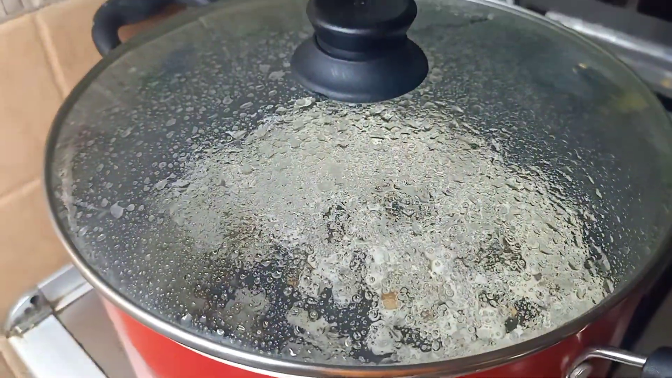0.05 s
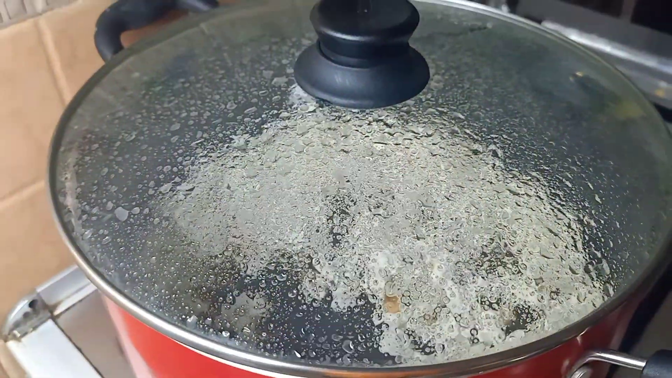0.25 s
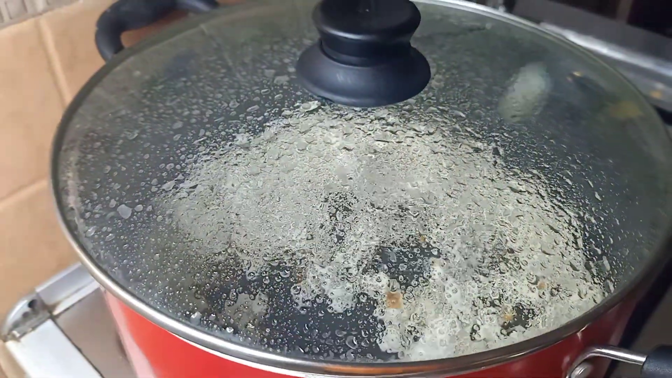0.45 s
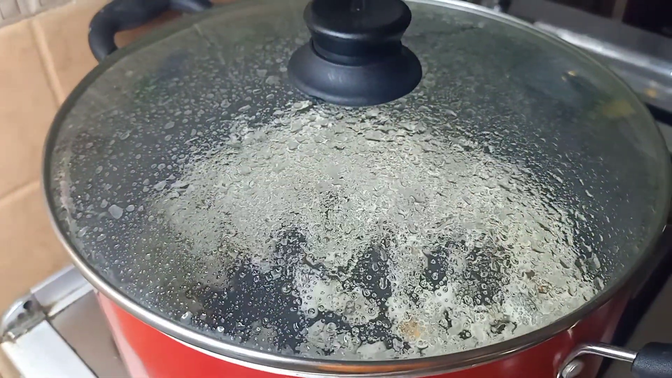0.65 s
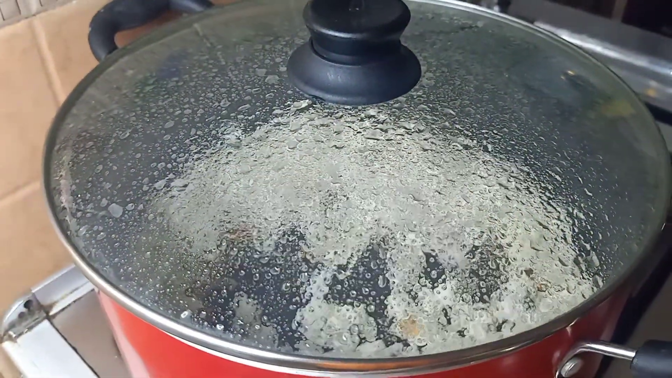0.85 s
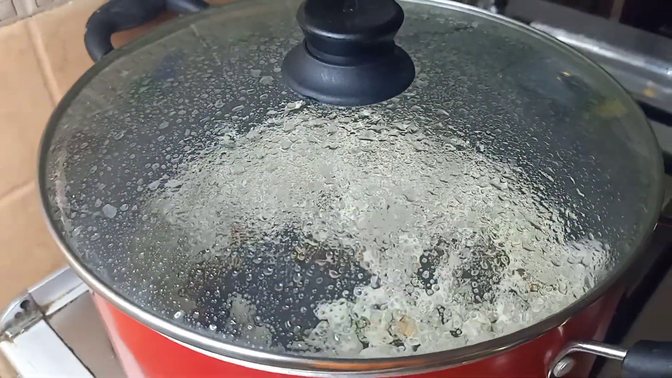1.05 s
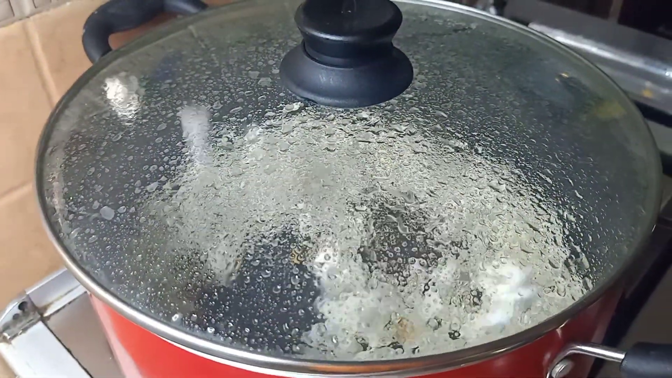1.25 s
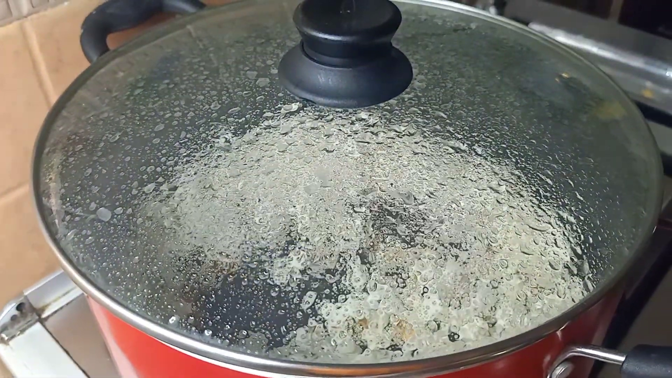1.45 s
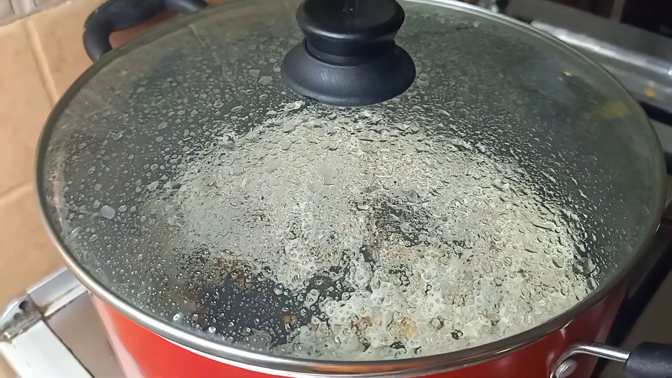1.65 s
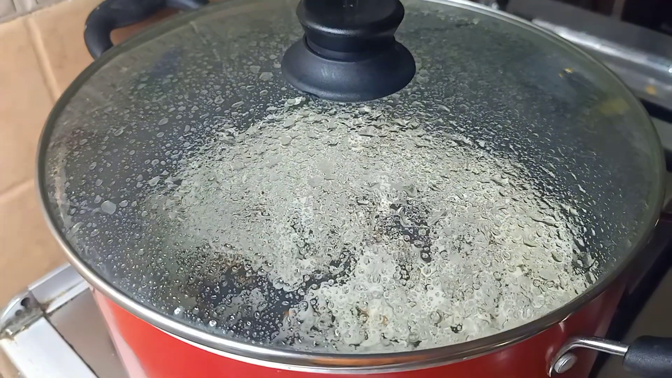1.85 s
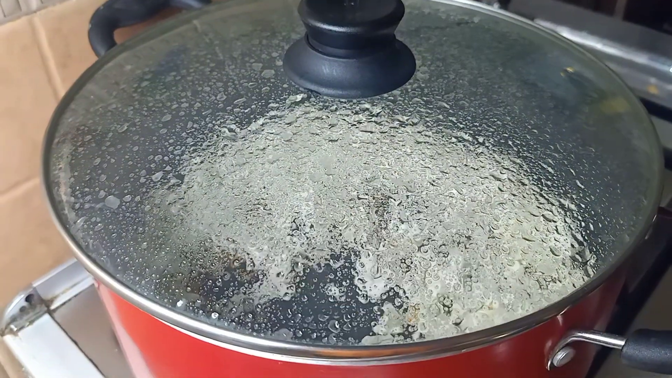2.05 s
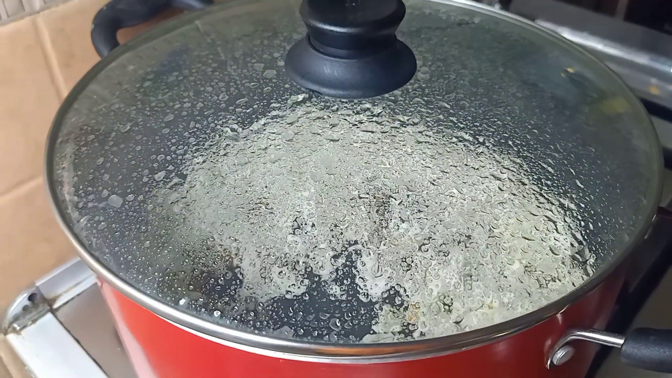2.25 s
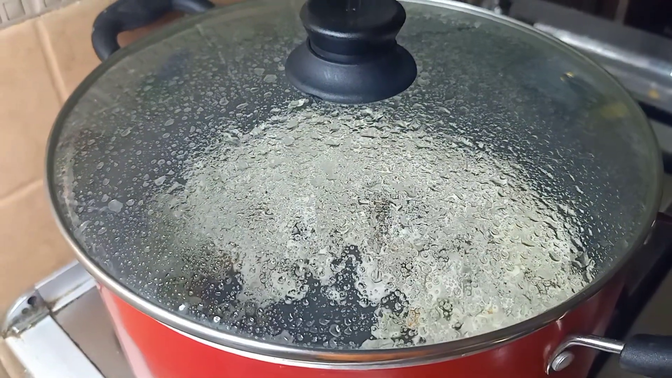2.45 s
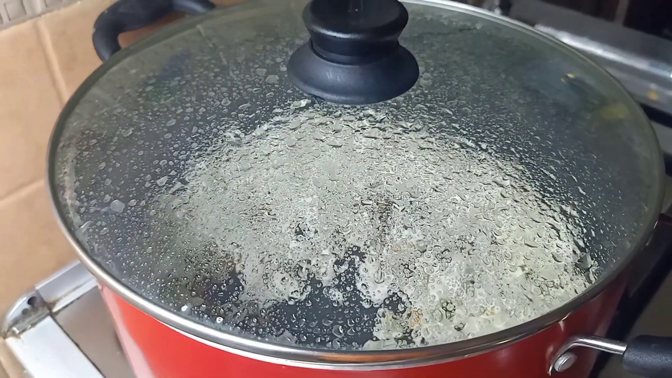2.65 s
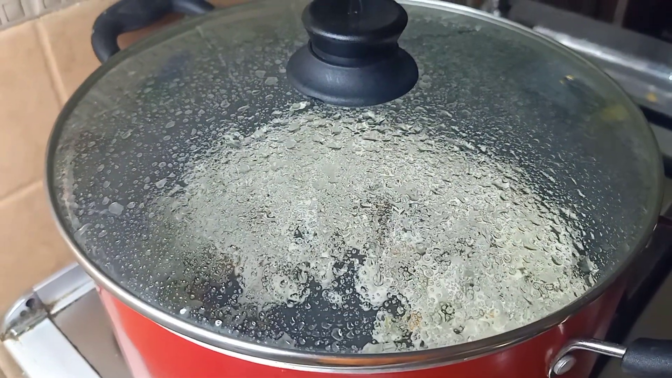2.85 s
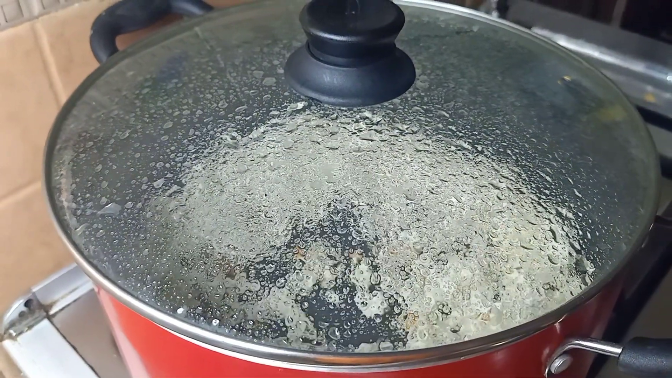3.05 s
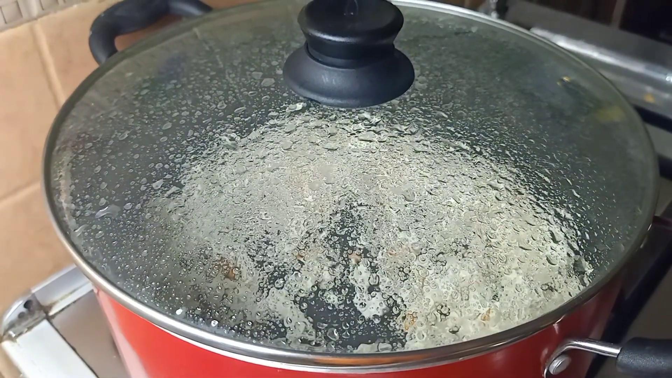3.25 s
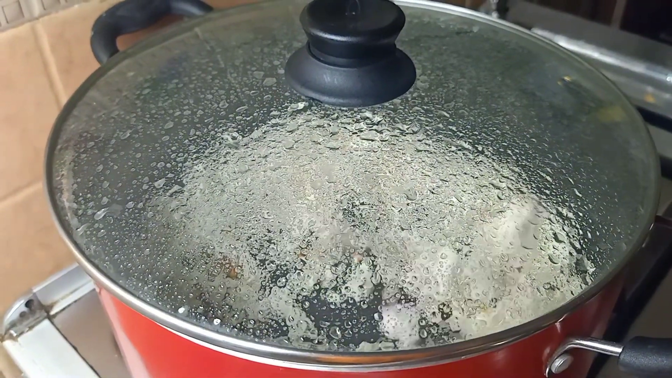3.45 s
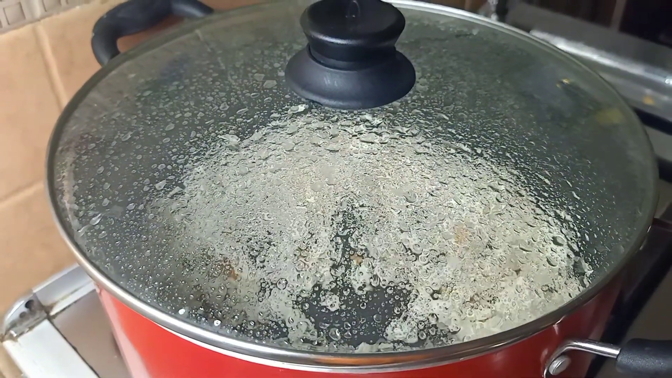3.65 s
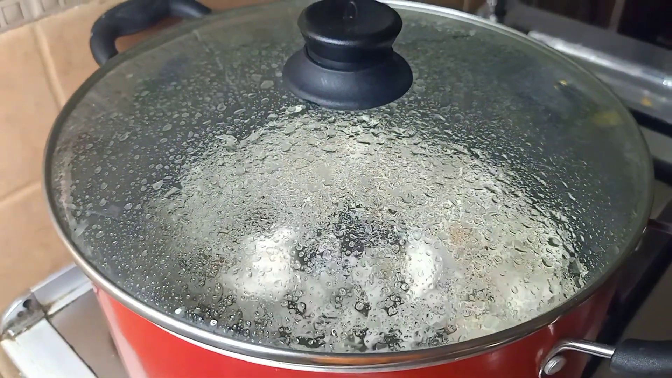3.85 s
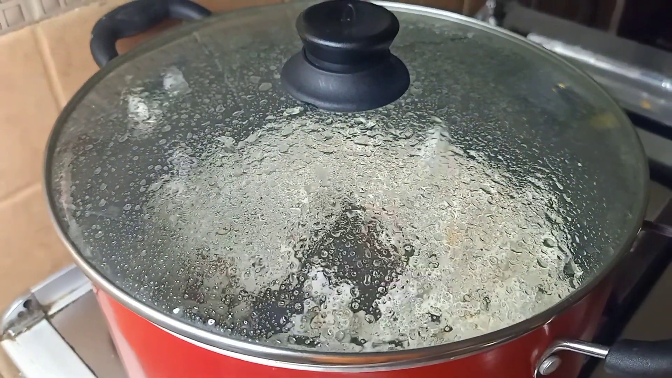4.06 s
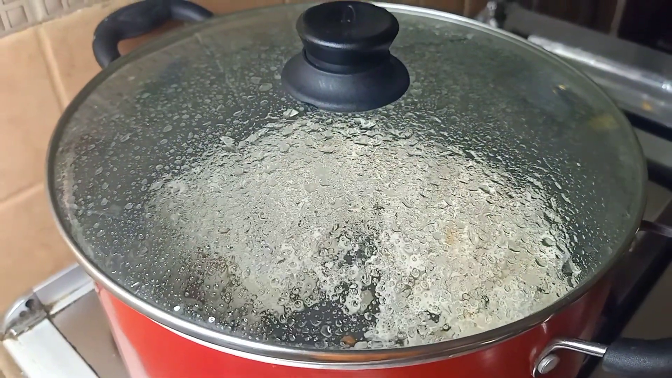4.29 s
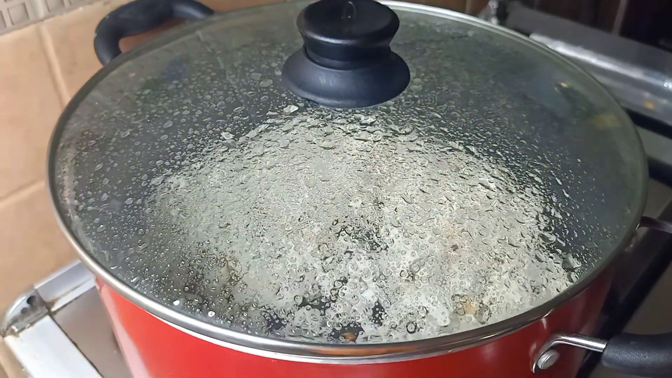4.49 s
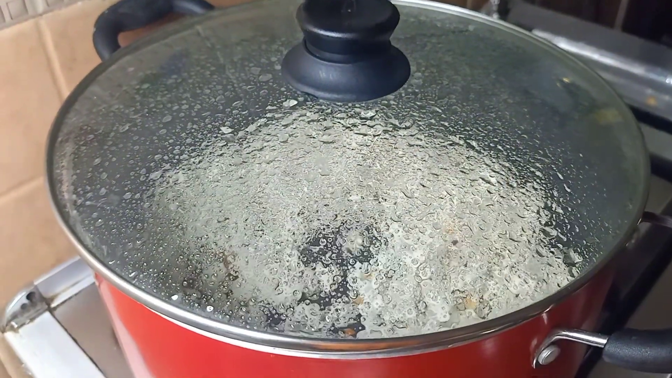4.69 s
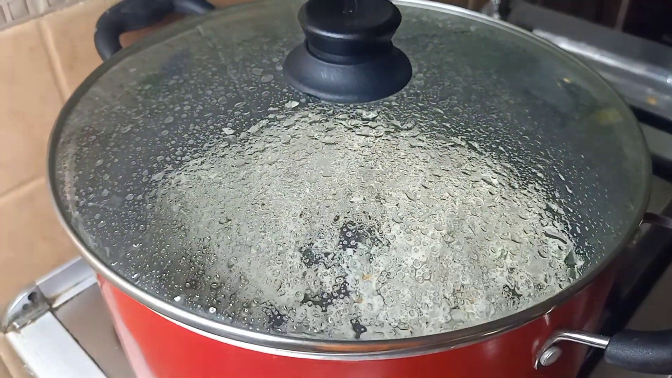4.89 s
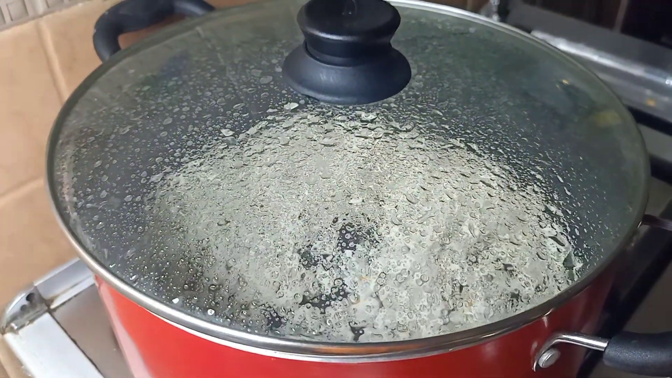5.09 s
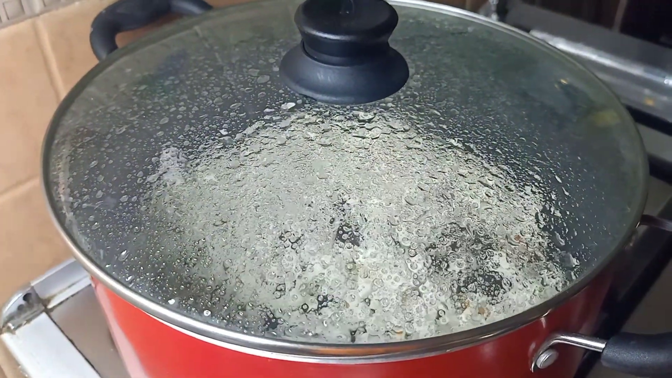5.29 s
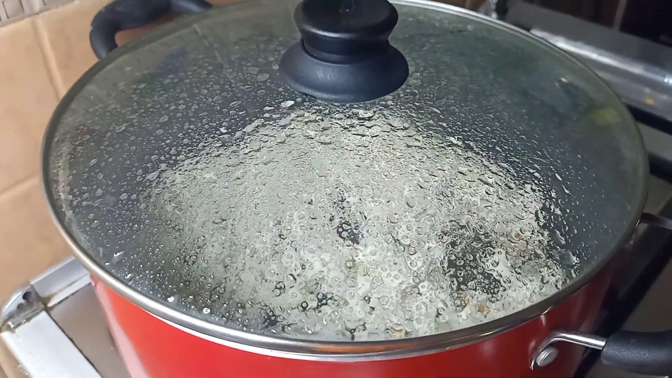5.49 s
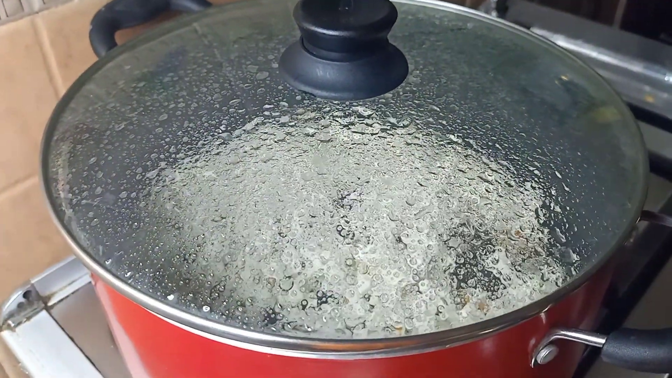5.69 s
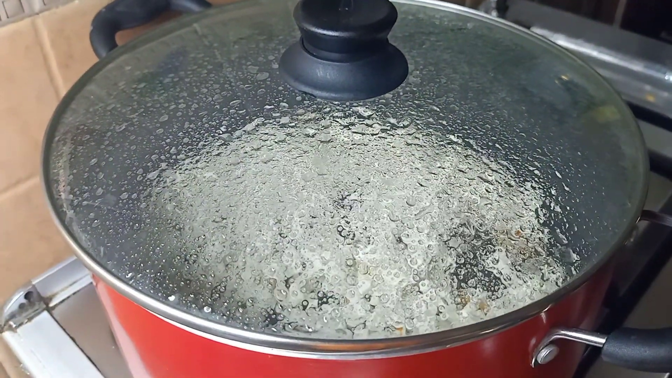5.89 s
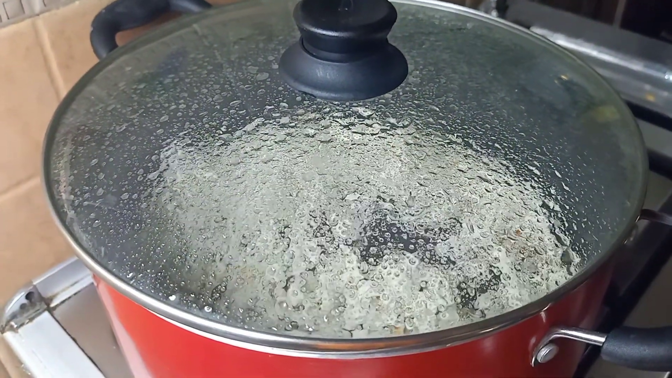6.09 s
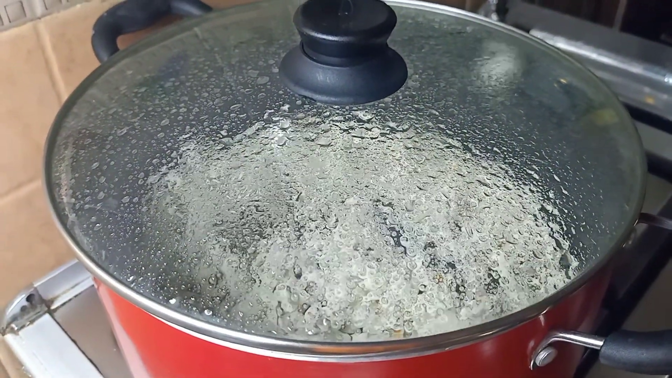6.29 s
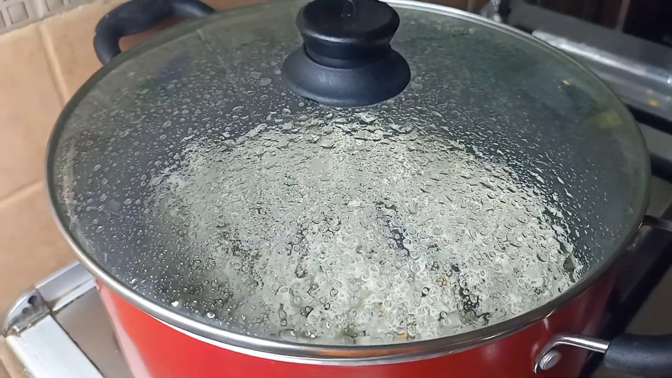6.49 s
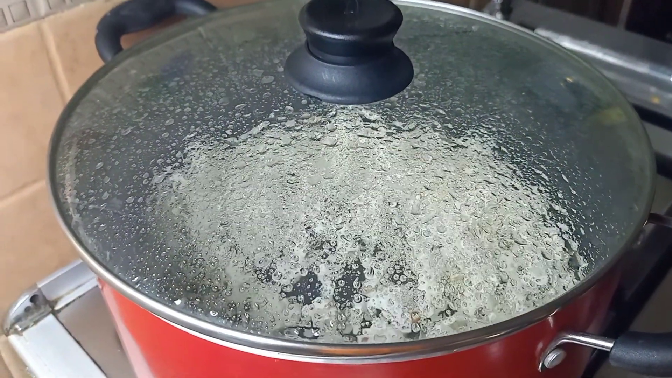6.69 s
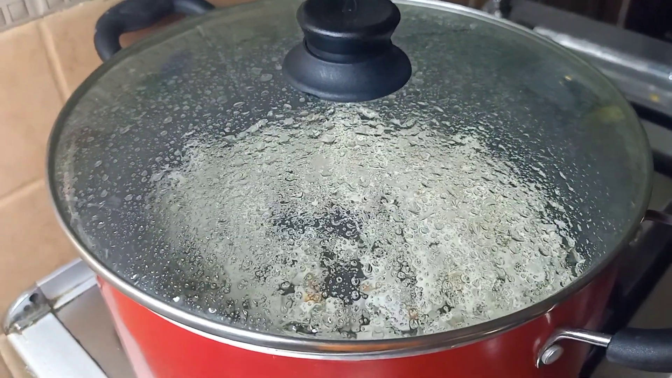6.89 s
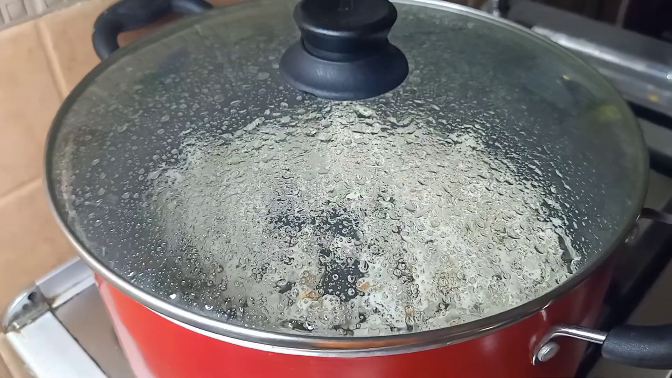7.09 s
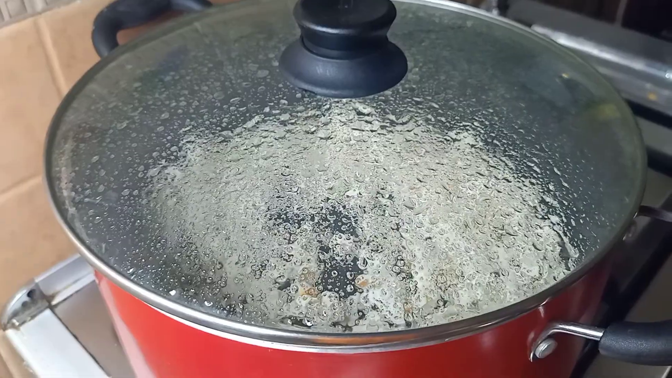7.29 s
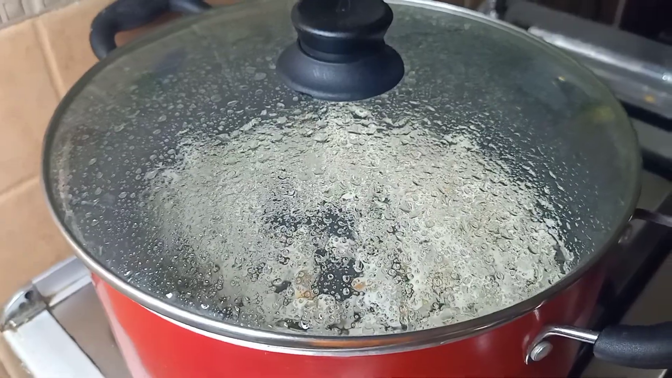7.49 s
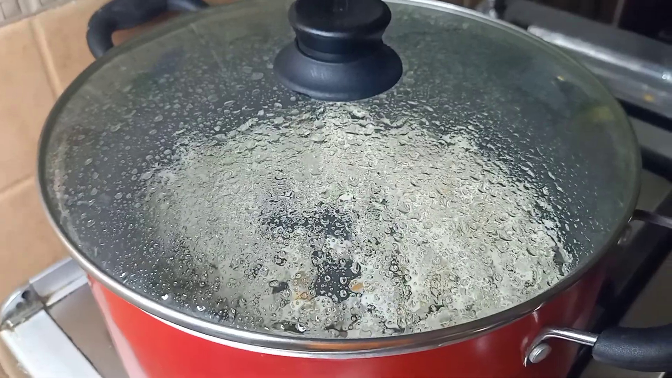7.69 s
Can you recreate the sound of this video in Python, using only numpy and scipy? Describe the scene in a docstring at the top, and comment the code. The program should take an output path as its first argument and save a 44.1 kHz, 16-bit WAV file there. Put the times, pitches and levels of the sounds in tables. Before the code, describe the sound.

Kernels burst irregularly in a covered pot on a stove: dry crack, hollow thump, short metallic ring of wall and lid. Pops crowd together early, pause around two to three seconds, grow dense again past four, then come in scattered pairs. Tiny clinks, soft bumps and barely audible oil spits fill in. Close microphone, small kitchen with short echo, slightly stronger ringing on the right.

```python
"""Small kitchen: popcorn pops close by in a metal pot under a glass lid.
Each kernel bursts with a crack of steam, thumps the air in the pot and scatters flakes; pot and lid ring.
Pops are shaped noise plus decaying modes, shorter when strong; soon after onset the level drops, most if early.
Flung kernels clink on the walls as ringing modes, flakes bump on the base, hot oil spits as bright noise.
Underneath lie a faint noise sizzle and a low sine hum that wavers in pitch and level."""
import sys
import numpy as np
from scipy import signal
from scipy.fft import rfft, irfft
from scipy.io import wavfile

SR = 44100
rng = np.random.default_rng(int(sys.argv[2]) if len(sys.argv) > 2 else 0)


def bounce(signal):
    """Save signal as a 16-bit WAV file at the path given by the first command-line argument."""
    frames = np.transpose(np.atleast_2d(signal))
    limited = np.clip(frames, -1, 1)
    pcm = np.round(limited * 32767).astype(np.int16)
    wavfile.write(sys.argv[1], SR, pcm)


N = 341334
EVENT_SIZE = 12288  # samples
AGE_S = np.arange(EVENT_SIZE) / SR

# kitchen echo bands: (frequency [Hz], t60 [s], level [dB])
ROOM_BANDS = [(100, 0.068, -13.5), (226, 0.25, -5.5), (400, 0.42, -4.5), (840, 0.3, -6), (2500, 0.18, -9.5),
              (7140, 0.21, -12.5), (14750, .22, -13.5)]
# sizzle colour: (frequency [Hz], level [dB])
SIZZLE_COLOUR = [(25, -9), (60, -9), (110, 7.5), (185, -2.5), (300, -6.5), (345, -12), (395, -3),
                 (450, -11), (610, -9.5), (950, -10.5), (1500, -12.5), (2400, -6.5), (3300, -16.5),
                 (5000, -23.5), (7300, -21), (15000, -36)]
# slow swell of the low hum: (time [s], level [dB])
HUM_SWELL = [(0, -79), (2.4, -78.5), (2.58, -65.5), (2.85, -72), (2.98, -73.5), (5.5, -79), (5.65, -67),
             (5.85, -61), (5.96, -80), (7.35, -76), (7.55, -66.5), (7.68, -85)]
# spits of hot oil: (time [s], level [dB])
OIL_SPITS = [(1.017, -65.5), (1.667, -74), (3.707, -72.5), (4.011, -69), (4.373, -70.5), (4.92, -67.5),
             (4.963, -70.5), (6.8, -74), (6.997, -70.5)]
# flakes dropping back onto the base: (time [s], level [dB], pitch [Hz], t60 [s])
FLAKE_BUMPS = [(1.327, -41, 619, 0.078), (1.661, -60, 129, 0.11), (3.074, -54.5, 400, 0.11),
               (3.213, -62, 284, 0.15), (3.657, -55.5, 377, 0.047), (4.53, -57, 201, 0.074),
               (6.478, -61, 404, 0.067), (6.709, -51, 510, 0.049), (7.158, -59.5, 141, 0.17),
               (7.335, -62.5, 113, 0.24)]
# hard kernels striking the pot: (time [s], level [dB], pitch [Hz], t60 [s])
KERNEL_CLINKS = [(0.294, -52, 1510, .04), (.534, -33.5, 2500, 0.081), (0.694, -28, 3470, 0.036),
                 (.885, -39, 2265, 0.19), (1.133, -44, 1035, 0.12), (1.338, -29.5, 2140, 0.027),
                 (1.342, -25.5, 2685, 0.029), (2.077, -34, 2700, 0.081), (3.786, -36.5, 2240, 0.024),
                 (3.95, -36.5, 2140, 0.012), (4.013, -41, 1390, 0.011), (4.071, -34, 2630, 0.06),
                 (4.209, -23, 2500, 0.053), (4.222, -32, 3030, 0.034), (4.487, -51, 2500, 0.054),
                 (4.805, -38.5, 2570, 0.035), (4.811, -40.5, 2900, 0.031), (5.286, -39, 2730, 0.13),
                 (6.028, -31.5, 1340, 0.016), (6.057, -41, 2400, 0.012), (6.058, -43, 4000, 0.018),
                 (6.104, -43, 3150, 0.017), (6.729, -49.5, 2500, 0.12), (6.899, -52, 2640, 0.054),
                 (6.918, -49, 3310, 0.086)]
# bursting kernels: (time [s], level [dB], thump over level [dB], knock over level [dB], crack over level [dB],
# time from onset to the drop in level [s], wall pitch [Hz], left minus right of the wall sound [dB])
KERNEL_POPS = [(0.22, -43, -10, -14, -15, .092, 2030, -8), (0.266, -46, 3, -4.5, -11, 0.057, 1678, -3),
               (0.53, -48, 6, 1, -11.5, 0.046, 2600, -3), (0.561, -31, -5.5, -8.5, -8.5, 0.011, 2394, -2.5),
               (0.621, -36.5, -9, -14.5, -23, 0.073, 1940, -4),
               (0.642, -25, -4, -8.5, -11, 0.061, 2400, -3), (0.719, -30, -6, -17, -3.5, 0.026, 2855, -3.5),
               (0.883, -39.5, -8, -7, -16, 0.13, 2020, 0),
               (1.104, -36.5, -0.5, -14.5, -13, 0.095, 2470, -3.5),
               (1.281, -38, 7.5, -13.5, -11.5, 0.09, 2490, -4.5),
               (1.336, -38.5, -4.5, -6, -9.5, 0.026, 2470, -5),
               (1.504, -40.5, -9.5, -20.5, -6.5, 0.031, 2520, -4.5),
               (1.856, -50, 4.5, -1, -18, 0.13, 2000, -3), (2.075, -38, 0, -9, 0, 0.054, 2856, 0),
               (2.961, -42.5, -2, -2.5, -7.5, 0.039, 1936, -4),
               (2.981, -48.5, -20, 1.5, -13, 0.03, 2860, -15),
               (2.997, -30.5, -9, -19, -10.5, 0.0072, 2737, -2),
               (3.182, -48, 1, -4, -18.5, 0.041, 2390, -1.5), (3.58, -47, 0, -3, -8, 0.052, 2643, -2.5),
               (3.755, -39, 0, -4.5, -12, 0.048, 1690, -1.5), (3.783, -49.5, 2, 0.5, -21, 0.024, 2010, -7),
               (3.931, -32.5, -11, -13.5, -13.5, 0.0036, 1166, -2.5),
               (3.949, -43, -8, -11, -21.5, 0.14, 2110, -4), (4.067, -44.5, -4, -5, -8.5, 0.14, 2654, -1),
               (4.155, -54, 2, 1.5, -28, 0.11, 2640, -3), (4.199, -32.5, -11, -10, -11.5, 0.04, 1324, -3),
               (4.214, -26.5, -12.5, -18.5, -11, 0.025, 3047, -2.5),
               (4.446, -33.5, -2.5, -13.5, -7.5, 0.014, 2780, -7),
               (4.504, -53.5, 4, 0.5, -9, 0.054, 2480, -3), (4.65, -25.5, -7.5, -20, -7.5, 0.029, 2037, -5),
               (4.771, -39.5, -4.5, -11, -13, 0.23, 2240, -3),
               (5.211, -34.5, -7.5, -11, -20, 0.0047, 1240, -5.5),
               (5.251, -35, 0.5, -1.5, -9, 0.0058, 1790, -7), (5.302, -35.5, -1, -9, -9, 0.082, 2360, -5.5),
               (5.612, -41.5, -7, -11, -16.5, 0.059, 2080, -4),
               (6.027, -34.5, 1.5, -13, -16.5, 0.086, 1610, -3),
               (6.054, -40, -9, -2, -11.5, 0.13, 1764, -7.5),
               (6.241, -29.5, -10.5, -11.5, -11, 0.029, 2477, -2.5),
               (6.334, -32, -7, -11.5, -6.5, 0.027, 2430, -1.5),
               (6.649, -34.5, 0.5, -5, -8, 0.026, 2680, -11), (6.655, -29.5, -4, -3, -8.5, 0.015, 1960, -1),
               (6.853, -39.5, 4, -2, -16.5, 0.032, 1983, -8), (6.896, -49, -10, -24, -12, 0.041, 2490, -2)]
# modes of the air and base of the pot: (frequency [Hz], level [dB], t60 [s])
CAVITY_MODES = [(113.8, -15, 0.2), (179, -5, 0.081), (194.5, 3, 0.055), (228, -11.5, 0.1),
                (383.4, -23.5, 0.23), (533, -43, 0.11), (596.4, -31, 0.26)]
# modes of wall and lid: (frequency [Hz], level [dB], t60 [s])
LID_MODES = [(1033, 0, .14), (1230, -4, .07), (1420, -5, .06), (1675, 0, .16), (1997, -1, .13),
             (2234, -4, .1), (2445, -1, .12), (2612, -2, .1), (2745, -3, .12), (2875, -6, .1),
             (3070, -7, .1), (3205, -8, .1), (3975, -13, .08)]
# colour of the rattling flakes: (frequency [Hz], level [dB])
RATTLE_COLOUR = [(300, -40.5), (700, -13), (1050, -0.5), (1400, -4), (2000, 3), (2700, 2), (3400, -4.5),
                 (4500, -8.5), (6500, -20), (12000, -65)]
# colour of the steam crack: (frequency [Hz], level [dB])
CRACK_COLOUR = [(1500, -41.5), (3500, 2.5), (5200, -5.5), (7300, 4), (9000, -4.5), (11500, -11.5),
                (13500, -14.5), (16000, -29)]
# colour of the hollow knock: (frequency [Hz], level [dB])
KNOCK_COLOUR = [(60, -29.5), (130, -5), (260, 1.5), (385, 4.5), (455, -8), (530, -1), (620, -4.5),
                (720, -11.5), (900, -4), (1400, -15), (4000, -66)]

SIZZLE_DB, HUM_FLICKER_DB = -68.5, 4.5
# a strong pop is spent sooner: flake t60 at the usual level, rise in level that halves it
USUAL_POP_DB, FLAKES_T60_S, HALVING_DB = -35, 0.19, 15.5
# drop in level after a pop: deepest drop, delay that shrinks it by 1 / e, time to fall
DROP_DB, DROP_EASE_S, FALL_S = -14, 0.06, 0.003
# lift of the rattle at the wall and lid modes (for a 0 dB mode), and its width
LID_LIFT_DB, LID_WIDTH_HZ = 7.5, 50
TOP_HZ = 15700


def undb(db):
    """Decibels to gain."""
    return 10 ** (np.asarray(db) / 20)


def fade(t60_s):
    """Exponential decay over one event, t60 at least 3 ms."""
    return np.exp(-np.log(1000) * AGE_S / max(t60_s, .003))


def rise(time_s):
    """Linear onset from 0 to 1."""
    return np.clip(AGE_S / time_s, 0, 1)


def unit(sound):
    """Scale an event to rms 1 over its first 14 ms."""
    return sound / np.sqrt(np.mean(sound[..., :617] ** 2))


def along(points, size, column=1):
    """Table column interpolated over log frequency at every bin of a spectrum."""
    table = np.array(points)
    bins_hz = np.maximum(np.arange(size // 2 + 1) * SR / size, 1)
    return np.interp(np.log(bins_hz), np.log(table[:, 0]), table[:, column])


def response(points, lift_db=0):
    """Causal minimum-phase filter of the given colour, by folding the cepstrum."""
    cepstrum = irfft(np.log(undb(along(points, EVENT_SIZE) + lift_db)))
    cepstrum[1:EVENT_SIZE // 2] *= 2
    cepstrum[EVENT_SIZE // 2 + 1:] = 0
    return np.exp(rfft(cepstrum))


def tint(sound, colour):
    """Give an event a colour and level 1."""
    return unit(irfft(rfft(sound) * colour))


def air(size):
    """Stereo white noise: alike at both ears in the bass, unrelated in the treble."""
    mid, side = rfft(rng.standard_normal((2, size)))
    width = np.minimum(np.arange(len(mid)) * SR / size / 1250, 1) ** 1.4
    left_right = mid + np.array([[1], [-1]]) * width * side
    return irfft(left_right / np.sqrt(1 + width ** 2), size)


def walk(size, rate_hz):
    """Random wandering: straight lines between normal draws."""
    steps = rng.standard_normal(4096)
    return np.interp(np.arange(size) / SR * rate_hz, np.arange(len(steps)), steps)


def pan(db):
    """Gains of left and right, db apart."""
    return undb(np.array([[db], [-db]]) / 2)


def ring(modes, scatter_db, detune, phase_spread):
    """Decaying modes; strengths and phases depend on where the blow lands."""
    out = 0
    for hz, db, t60_s in modes:
        size, shift, left, right = rng.standard_normal(4)
        turn = 2 * np.pi * hz * (1 + detune * shift) * AGE_S
        phase = phase_spread * np.array([[left], [right]])
        out = out + undb(db + scatter_db * size) * fade(t60_s) * np.sin(turn + phase)
    return unit(out)


def kitchen():
    """Room response: direct sound, then noise bands dying at their own rates."""
    noise, out = rfft(air(EVENT_SIZE)), 0
    onset = np.clip((AGE_S - .005) / 0.012, 0, 1)
    for k, (hz, t60_s, db) in enumerate(ROOM_BANDS):
        share = along([(row[0], float(j == k)) for j, row in enumerate(ROOM_BANDS)], EVENT_SIZE)
        decay = fade(t60_s) * onset
        out = out + undb(db) * irfft(noise * share) * decay / np.sqrt(np.sum(decay ** 2))
    out[:, 0] += 1
    return out


def heard(sound, room):
    """An event together with its echo in the room."""
    return signal.fftconvolve(sound, room, axes=1)[:, :EVENT_SIZE]


def add(out, start_s, sound):
    """Mix an event in at its time."""
    first = int(start_s * SR)
    out[:, first:first + EVENT_SIZE] += sound[:, :N - first]


def stove(hum_hz=110, waver_hz=6):
    """Faint even sizzle of coloured noise, and a low hum wavering in pitch and level."""
    grainy = air(N) * undb(1.0 * walk(N, 420))
    sizzle = irfft(rfft(grainy) * undb(along(SIZZLE_COLOUR, N)), N)
    pitch_hz = hum_hz + waver_hz * walk(N, 35)
    hum = np.sqrt(2) * np.sin(2 * np.pi * np.cumsum(pitch_hz) / SR)
    swell_db = np.interp(np.arange(N) / SR, *np.transpose(HUM_SWELL))
    hum_db = swell_db + HUM_FLICKER_DB * walk(N, 18)
    return undb(SIZZLE_DB) * sizzle / sizzle.std() + undb(hum_db) * hum


def spit(colours):
    """Hot oil spits: a short decay of bright noise."""
    return tint(air(EVENT_SIZE) * fade(0.1), colours["crack"])


def bump(hz, t60_s, colours):
    """A soft flake lands: slow push on a close pair of low modes, with a little knock."""
    pair = [(hz, 0, t60_s), (hz * .87, -6, t60_s)]
    tone = ring(pair, scatter_db=0, detune=.01, phase_spread=.2)
    knock = tint(air(EVENT_SIZE) * fade(t60_s), colours["knock"])
    return unit(rise(0.0026) * (tone + undb(-13.5) * knock))


def lid():
    """Wall and lid ring together, a little differently at every blow."""
    return ring(LID_MODES, scatter_db=2.5, detune=.004, phase_spread=1.5)


def lid_peaks():
    """Lift in dB that the modes of wall and lid give to a sound inside the pot."""
    bins_hz = np.arange(EVENT_SIZE // 2 + 1) * SR / EVENT_SIZE
    peaks = sum(undb(db) * np.exp(-((bins_hz - hz) / LID_WIDTH_HZ) ** 2) for hz, db, _ in LID_MODES)
    return LID_LIFT_DB * peaks


def hull(hz, t60_s=0.05, neighbours_db=-4):
    """Short wall modes around the pitch of the spot where the kernel lies."""
    modes = [(hz * .84, neighbours_db, t60_s / 2), (hz, 0, t60_s), (hz * 1.02, neighbours_db, t60_s / 2)]
    return ring(modes, scatter_db=1.5, detune=.004, phase_spread=1.2)


def clink(hz, t60_s, colours):
    """A hard kernel rings the wall where it strikes, with a tick and a little of the lid."""
    wall = undb(-6) * hull(hz, t60_s, neighbours_db=1.0)
    tick = undb(-16.5) * tint(air(EVENT_SIZE) * fade(t60_s), colours["rattle"])
    return pan(-8.5) * rise(0.0012) * (wall + tick + undb(-34.5) * lid())


def burst(t60_s, flakes_db, snap_t60_s=0.04):
    """The hull splits in a rush of steam; shaken flakes follow in grainy clumps."""
    clumps = undb(2.5 * walk(EVENT_SIZE, 110) * rise(.015))
    grain = undb(3.5 * walk(EVENT_SIZE, 700))
    flakes = undb(flakes_db) * clumps * fade(t60_s)
    envelope = (fade(snap_t60_s) + flakes) * rise(0.0032)
    return air(EVENT_SIZE) * envelope * grain


def level_drop(delay_s):
    """Full level for a given time, then the pop and its echo drop quickly in level."""
    drop_db = DROP_DB * np.exp(-delay_s / DROP_EASE_S)
    return undb(drop_db * np.clip((AGE_S - delay_s) / FALL_S, 0, 1))


def pop(thump_db, knock_db, crack_db, t60_s, wall_hz, pan_db, colours):
    """One kernel: rattle, ringing wall and lid, bright crack, hollow knock, thump of the air in the pot."""
    swell = 1 - np.exp(-AGE_S / 0.0048)
    rattle = tint(burst(t60_s, flakes_db=5.0), colours["rattle"])
    walls = undb(-4.5) * rattle
    walls = walls + undb(-8.5) * swell * lid()
    walls = walls + undb(-7.0) * unit(swell * hull(wall_hz))
    crack = tint(burst(t60_s, flakes_db=-1.0), colours["crack"])
    knock = tint(burst(t60_s, flakes_db=11.5), colours["knock"])
    thump = unit(swell * ring(CAVITY_MODES, scatter_db=1.5, detune=.04, phase_spread=.15))
    noises = undb(crack_db) * crack + undb(knock_db) * knock
    return pan(pan_db) * walls + noises - undb(thump_db) * thump


def scene():
    """Spits, bumps, clinks and pops in the kitchen, over the stove."""
    out, room = stove(), kitchen()
    colours = {"knock": response(KNOCK_COLOUR), "crack": response(CRACK_COLOUR),
               "rattle": response(RATTLE_COLOUR, lid_peaks())}
    for start_s, db in OIL_SPITS:
        add(out, start_s, undb(db) * heard(spit(colours), room))
    for start_s, db, hz, t60_s in FLAKE_BUMPS:
        add(out, start_s, undb(db) * heard(bump(hz, t60_s, colours), room))
    for start_s, db, hz, t60_s in KERNEL_CLINKS:
        add(out, start_s, undb(db) * heard(clink(hz, t60_s, colours), room))
    for start_s, db, thump_db, knock_db, crack_db, drop_delay_s, wall_hz, pan_db in KERNEL_POPS:
        t60_s = FLAKES_T60_S * 2 ** ((USUAL_POP_DB - db) / HALVING_DB)
        kernel = pop(thump_db, knock_db, crack_db, t60_s, wall_hz, pan_db, colours)
        add(out, start_s, undb(db) * heard(kernel, room) * level_drop(drop_delay_s))
    return out


def record(dry, bass_hz=55):
    """Gentle high-pass thins the deep bass; steep elliptic low-pass cuts the top."""
    thinned = signal.sosfilt(signal.butter(1, bass_hz, "high", fs=SR, output="sos"), dry)
    return signal.sosfilt(signal.ellip(8, .2, 70, TOP_HZ, fs=SR, output="sos"), thinned)


dry = scene()
out = record(dry)
bounce(out)
```